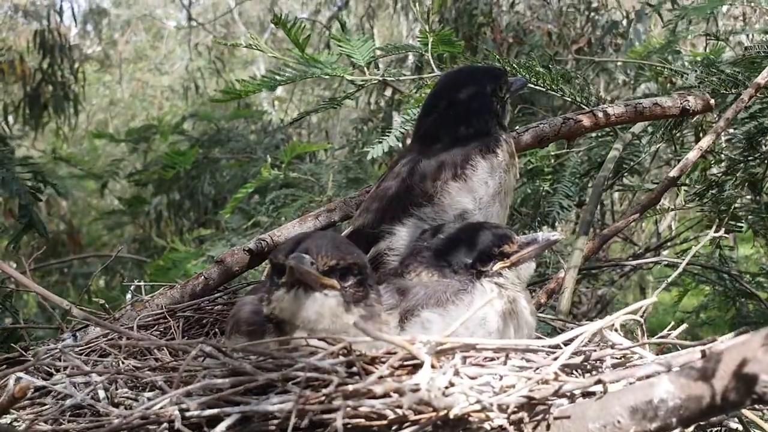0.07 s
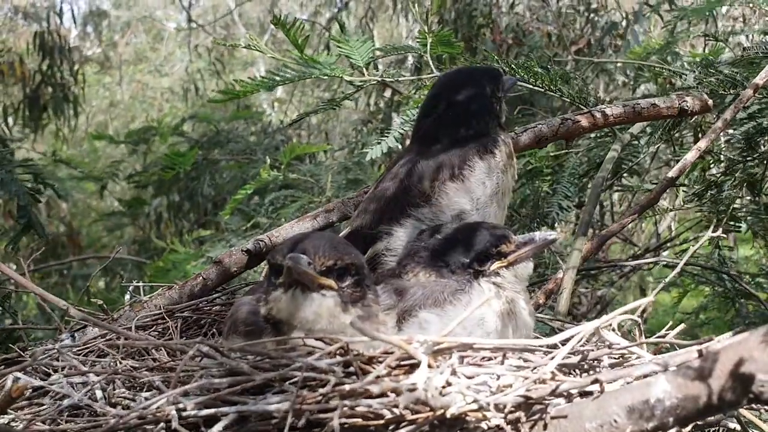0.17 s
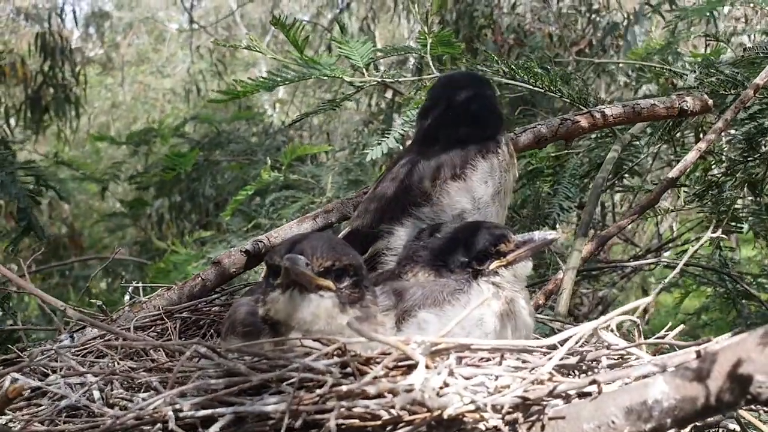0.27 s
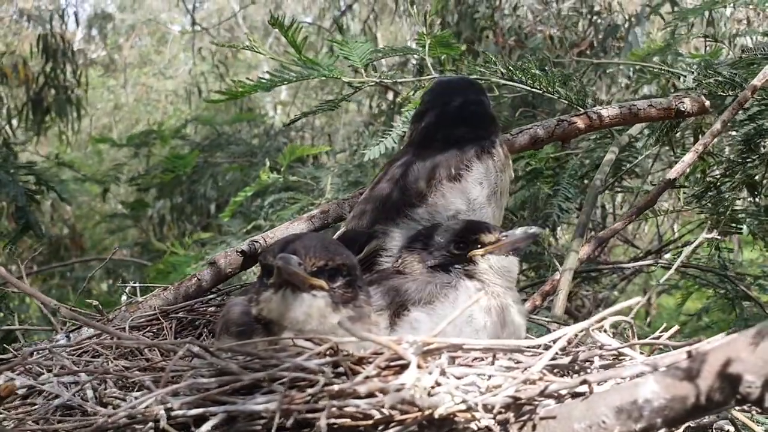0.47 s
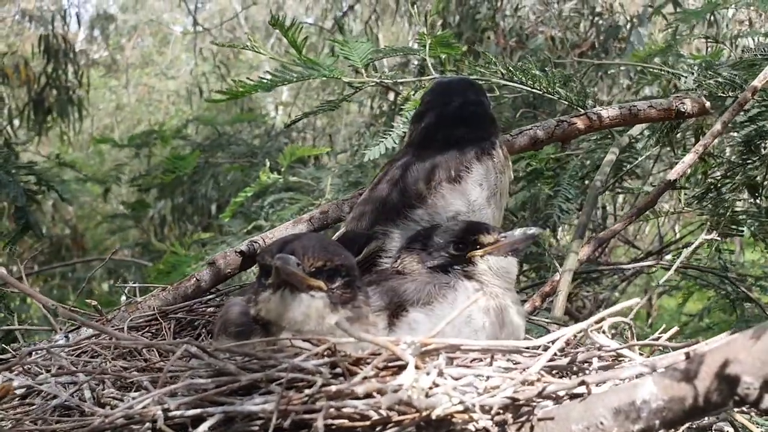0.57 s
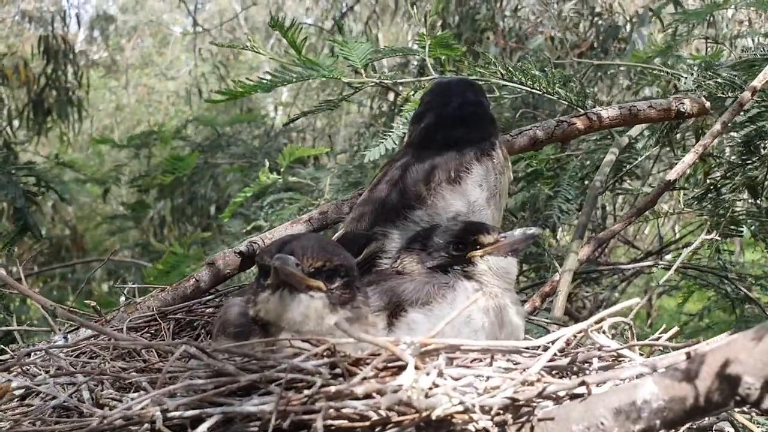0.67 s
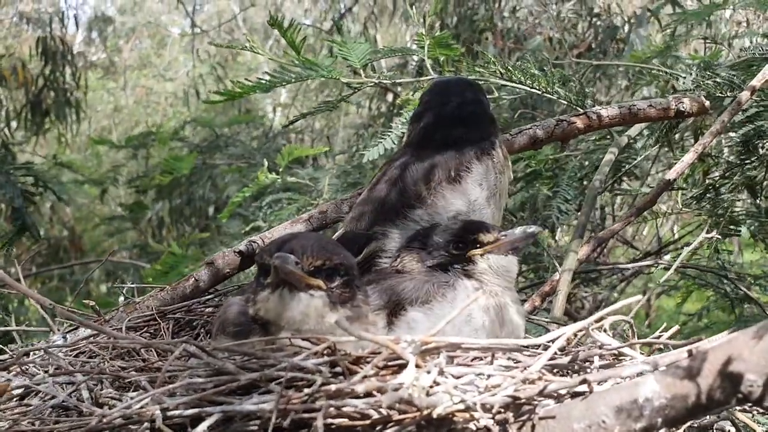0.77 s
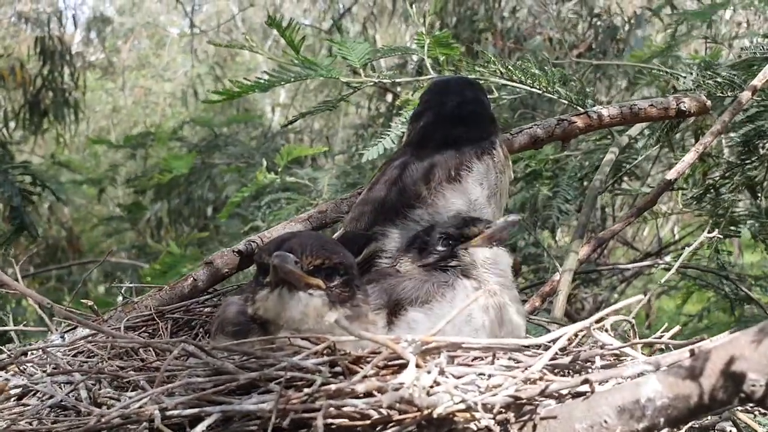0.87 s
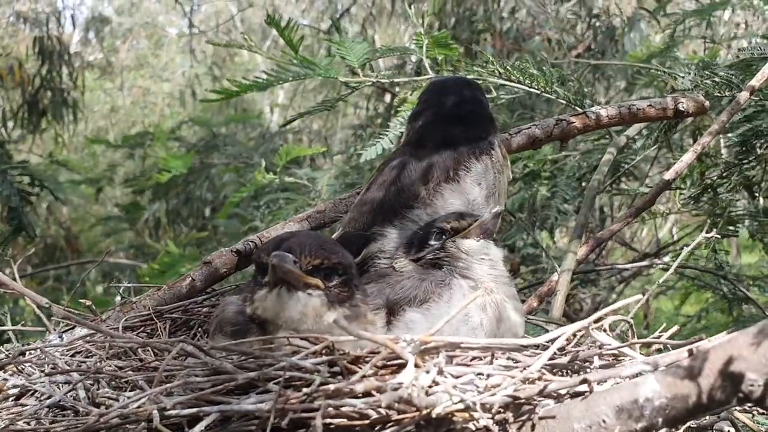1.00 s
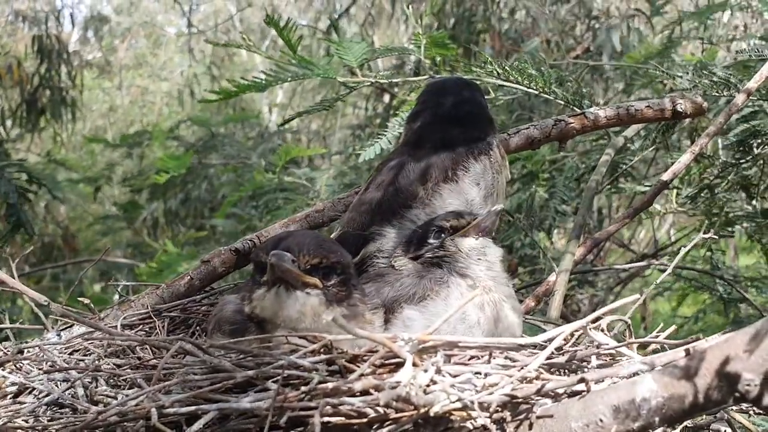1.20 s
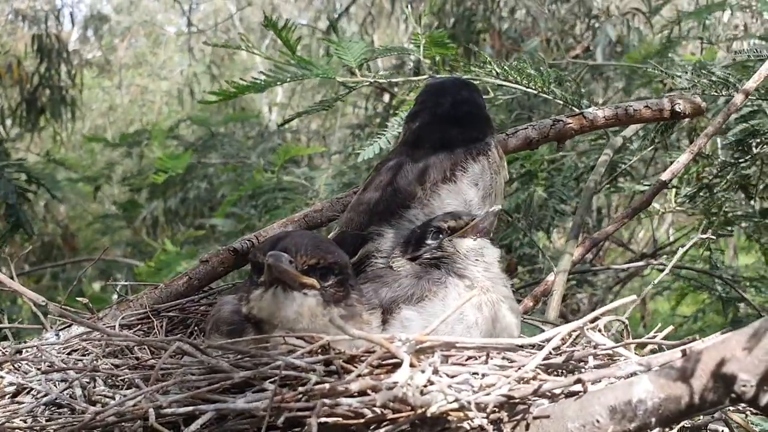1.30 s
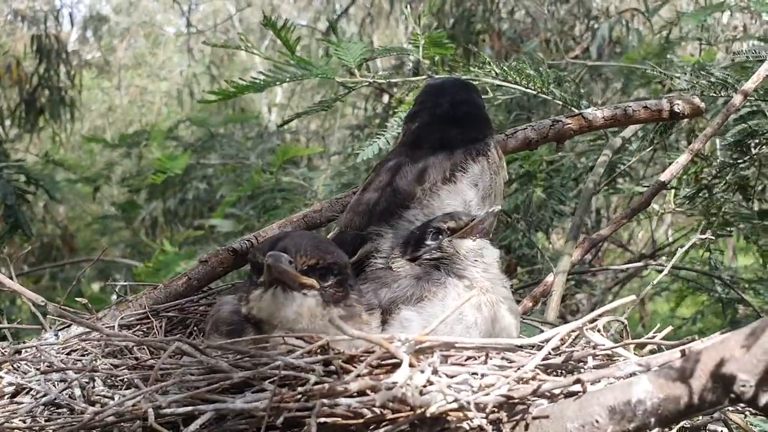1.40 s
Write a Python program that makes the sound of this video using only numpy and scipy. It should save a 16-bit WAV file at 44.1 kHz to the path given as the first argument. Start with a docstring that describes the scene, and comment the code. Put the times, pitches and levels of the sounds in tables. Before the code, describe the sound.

A young bird gives a short, creaky call at about 0.2 seconds and another at about 1 second, slightly to the left. Each lasts under a tenth of a second, starting as a thin, high, wavering note, then cracking an octave down, growing louder and ending in a rasp with a faint, short echo. Throughout, air hisses softly in the leaves over a low, distant rumble.

```python
"""A young bird gives two short, creaky calls from a nest in open woodland.
Each starts as a thin, wavering note from a vibrating membrane in its throat. The vibration
then repeats half as often, so the note breaks an octave down, gets louder and frays at the end.
Branches scatter a little of the sound. Behind it are the steady hiss of air in the leaves
and a low, distant rumble."""
import sys
import numpy as np
from scipy import signal
from scipy.fft import rfft, irfft
from scipy.io import wavfile

SR = 44100
rng = np.random.default_rng(int(sys.argv[2]) if len(sys.argv) > 2 else 0)


def bounce(signal):
    """Save signal as a 16-bit WAV file at the path given by the first command-line argument."""
    frames = np.transpose(np.atleast_2d(signal))
    limited = np.clip(frames, -1, 1)
    pcm = np.round(limited * 32767).astype(np.int16)
    wavfile.write(sys.argv[1], SR, pcm)


N = 63945
T = np.arange(N) / SR
HZ = np.maximum(np.arange(N // 2 + 1) * SR / N, 1)

# Levels in the tables are relative. The path of each call: t/s, f/Hz, note level/dB, low octave level/dB
FIRST_CALL = [(0.174, 1900, -62, -80), (0.178, 2050, -48.5, -68), (0.189, 2080, -46, -62),
              (0.194, 2450, -62, -70), (0.201, 2450, -48, -70), (0.205, 2420, -37, -66),
              (0.209, 2350, -41, -48), (0.212, 2340, -45, -30), (0.216, 2660, -44, -25),
              (0.219, 2660, -45, -27), (0.223, 2260, -43, -29.5), (0.2255, 2000, -45, -42),
              (0.2295, 2450, -48, -44), (0.232, 2250, -38, -62), (0.235, 1700, -40, -66),
              (0.239, 1660, -37.5, -66), (0.244, 2120, -42, -54), (0.251, 1900, -50, -40.5),
              (0.2575, 2040, -49, -38.5), (0.2605, 2080, -68, -72)]
SECOND_CALL = [(1.0005, 2000, -66, -80), (1.003, 2060, -43.5, -72), (1.014, 2230, -41, -72),
               (1.019, 2150, -41.5, -70), (1.0245, 1910, -43, -62), (1.029, 2290, -40.5, -70),
               (1.0335, 2320, -39, -58), (1.036, 2200, -47, -36.5), (1.04, 2100, -44, -34),
               (1.043, 2040, -45, -28.5), (1.051, 2100, -44, -30.5), (1.057, 2300, -49, -46),
               (1.06, 2250, -46, -54), (1.062, 2020, -45, -60), (1.065, 2050, -41.5, -46),
               (1.069, 1700, -44, -62), (1.072, 1660, -46, -68), (1.076, 1620, -68, -76)]
# Higher tones above the note and above its low octave: multiple of the note's pitch, level/dB
NOTE_OVERTONES = [(2, -18), (3, -23.5)]
LOW_OVERTONES = [(1.5, -24), (2.5, -32.5)]
# Moments when the voice cracks, and when the open beak hisses: t/s, half length/s, level/dB
CRACKS = [(0.182, 0.009, -55), (0.2264, 0.0034, -40.5), (0.247, 0.009, -48.5), (1.034, 0.003, -48),
          (1.066, 0.0053, -45.5)]
BEAK_HISSES = [(0.218, 0.013, -54), (1.044, 0.017, -65)]
# Tone colour of the voice's rasp, the beak's hiss and the air in the leaves: f/Hz, level/dB
RASP_COLOUR = [(500, -22), (800, -17), (1150, -5.5), (1700, -4.5), (2400, -4.5), (3200, -13), (4500, -19.5),
               (7000, -24), (9000, -36), (16000, -48)]
BEAK_COLOUR = [(3000, -33), (6500, -18), (8500, -18), (10300, 0), (11400, 13), (12600, -14), (14500, -17),
               (15500, -21)]
AIR_COLOUR = [(15, -41), (25, -15), (53, -3), (75, -1), (136, -8), (178, -5.5), (233, -9.5), (598, -12),
              (1850, -19), (2360, -19), (4870, -18.5), (5430, -21.5), (6730, -22), (7910, -31),
              (11200, -28.5), (15500, -37.5)]
# Tones at which the throat rings: f/Hz, level/dB
THROAT_TONES = [(1150, -3.5), (1650, -3.5), (2600, -7)]
# How alike the air sounds in both ears: f/Hz, likeness (1 = the same, 0 = unrelated)
AIR_LIKENESS = [(60, 0.98), (130, 1), (290, 0.88), (640, 0.59), (1400, -0.14), (3100, -0.072),
                (15000, 0.056)]
# How much louder the air is on the left: f/Hz, level/dB
AIR_BALANCE = [(60, -1.5), (200, 1.9), (400, 2.5), (1300, 3), (4400, 0), (8000, 2.5), (13000, 1)]
# The slight fading of the air: t/s, level/dB
AIR_FADE = [(0.0, -57), (0.37, -57), (1.45, -58.5)]

JITTER, CRACK_JITTER, JITTER_HZ = 0.0059, 0.021, 466   # pitch wobble: usual share, extra in a crack, speed
SHIMMER_DB, SHIMMER_HZ = 1.18, 307   # loudness flutter: size, speed
BIRD_DB, RASP_IN_VOICE_DB = -0.5, -25
SNAP_S, SNAP_DB, SNAP_FADE_S = 0.2283, -27.5, 0.005   # a fade time is the time to drop 60 dB
LEFT_LOUDER_DB, RIGHT_LAG_S = 3.4, 0.00003
SCATTER_DB, SCATTER_FADE_S, SCATTER_DELAY_S = -20.5, 0.16, 0.012
AIR_DB = -49
RUMBLE_HZ, RUMBLE_WIDTH_OCTAVES = 68, 0.3
RUMBLE_DB, RUMBLE_SWAY_DB, RUMBLE_SIDE_DB = -60, -1.5, -10.5
LOW_CUT_HZ, HIGH_CUT_HZ = 21, 15750


def bird():
    """Both calls, with a rasp where the voice cracks, one snap and a thin hiss from the open beak."""
    cracking = sum(swell(s, half_s) for s, half_s, _ in CRACKS)
    rasp = noise_puffs(CRACKS, RASP_COLOUR)
    hiss = noise_puffs(BEAK_HISSES, BEAK_COLOUR)
    first = call(FIRST_CALL, cracking, overtone_db=-2.5)
    second = call(SECOND_CALL, cracking, overtone_db=2)
    return from_db(BIRD_DB) * (first + second + rasp + throat_snap() + hiss)


def call(rows, cracking, overtone_db):
    """A membrane vibrates; when its motion takes twice as long to repeat, the octave below appears."""
    s, hz, note_db, low_db = np.transpose(rows)
    wobble = (JITTER + CRACK_JITTER * cracking) * drift(JITTER_HZ)
    pitch = np.interp(T, s, hz) * (1 + wobble)
    phase = 2 * np.pi * np.cumsum(pitch) / SR
    sounding = (T >= s[0]) & (T <= s[-1])
    strength = sounding * from_db(SHIMMER_DB * drift(SHIMMER_HZ))
    note_level = strength * np.interp(T, s, from_db(note_db))
    low_level = strength * np.interp(T, s, from_db(low_db))
    note_overtones = sum(from_db(db + overtone_db) * np.sin(k * phase) for k, db in NOTE_OVERTONES)
    low_overtones = sum(from_db(db + overtone_db) * np.sin(k * phase) for k, db in LOW_OVERTONES)
    voice = note_level * (np.sin(phase) + note_overtones)
    voice += low_level * (np.sin(phase / 2) + low_overtones)
    pulsing = 1 + np.sin(phase / 2)   # the rasp beats in step with the low octave
    rasp_level = from_db(RASP_IN_VOICE_DB) * (note_level + .5 * low_level) * pulsing
    return np.sqrt(2) * voice + rasp_level * noise(from_db(at_hz(RASP_COLOUR)))


def throat_snap():
    """Where the first call breaks, one hard pulse makes the throat ring for a moment."""
    age = np.maximum(T - SNAP_S, 0)
    ring = sum(from_db(db) * np.sin(2 * np.pi * hz * age) for hz, db in THROAT_TONES)
    return from_db(SNAP_DB - 60 * np.minimum(age / SNAP_FADE_S, 5)) * ring


def among_branches(voice):
    """The voice arrives a little from the left, and the branches throw back a faint, short echo."""
    late_voice = np.interp(T - RIGHT_LAG_S, T, voice)
    direct = np.array([voice, late_voice]) * from_db([[LEFT_LOUDER_DB / 2], [-LEFT_LOUDER_DB / 2]])
    fade = from_db(-60 * T / SCATTER_FADE_S) * (T > SCATTER_DELAY_S)
    scatter = rng.standard_normal((2, N)) * fade
    scatter /= np.sqrt(np.sum(scatter ** 2, axis=1, keepdims=True))
    echo = signal.fftconvolve(voice[None], scatter, axes=1)[:, :N]
    return direct + from_db(SCATTER_DB) * echo


def air():
    """Air hisses in the leaves: its low sounds are alike in both ears, its high ones spread wide."""
    shared, opposed = rfft(rng.standard_normal((2, N)))
    sides = np.array([[1], [-1]])   # left, right
    alike = np.clip(at_hz(AIR_LIKENESS), -.99, .99)
    both_ears = np.sqrt(1 + alike) * shared + sides * np.sqrt(1 - alike) * opposed
    colour = from_db(at_hz(AIR_COLOUR) + sides * at_hz(AIR_BALANCE) / 2)
    hiss = rms_one(irfft(colour * both_ears, N))
    fade_db = np.interp(T, *np.transpose(AIR_FADE))
    return from_db(AIR_DB + fade_db - fade_db.mean()) * hiss


def rumble():
    """A deep, far-off drone that sways in loudness, nearly the same in both ears."""
    band = np.exp(-.5 * (np.log2(HZ / RUMBLE_HZ) / RUMBLE_WIDTH_OCTAVES) ** 2)
    drone = noise(band) + from_db(RUMBLE_SIDE_DB) * noise(band) * np.array([[1], [-1]])
    sway = from_db(RUMBLE_SWAY_DB * drift(rate_hz=6.4))
    return from_db(RUMBLE_DB) * rms_one(drone * sway)


def noise_puffs(puffs, colour):
    """Short swells of noise that share one tone colour."""
    level = sum(from_db(db) * swell(s, half_s) for s, half_s, db in puffs)
    return level * noise(from_db(at_hz(colour)))


def swell(s, half_s):
    """A bell-shaped rise and fall around time s."""
    return np.exp(-.5 * ((T - s) / half_s) ** 2)


def drift(rate_hz):
    """Smooth random wandering with a typical size of 1."""
    return noise(1 / (1 + (HZ / rate_hz) ** 4))


def noise(gain):
    """Noise of typical size 1, shaped by a gain for each frequency."""
    return rms_one(irfft(rfft(rng.standard_normal(N)) * gain, N))


def at_hz(points):
    """Fill in a table for every frequency, giving each octave equal room."""
    hz, value = np.transpose(points)
    return np.interp(np.log(HZ), np.log(hz), value)


def rms_one(x):
    """Scale a signal so its typical size (root mean square) is 1."""
    return x / np.sqrt(np.mean(x ** 2) + 1e-20)


def from_db(db):
    """Turn decibels into a number to multiply by."""
    return 10 ** (np.asarray(db) / 20)


def scene():
    """The bird in front of the woodland background."""
    return among_branches(bird()) + air() + rumble()


def record(dry):
    """Soften the deepest bass and cut off the highest treble."""
    low_cut = 1 / np.sqrt(1 + (LOW_CUT_HZ / HZ) ** 8)
    high_cut = np.clip((HIGH_CUT_HZ - HZ) / 100 + .5, 0, 1)
    return irfft(rfft(dry) * low_cut * high_cut, N)


dry = scene()
out = record(dry)
bounce(out)
```